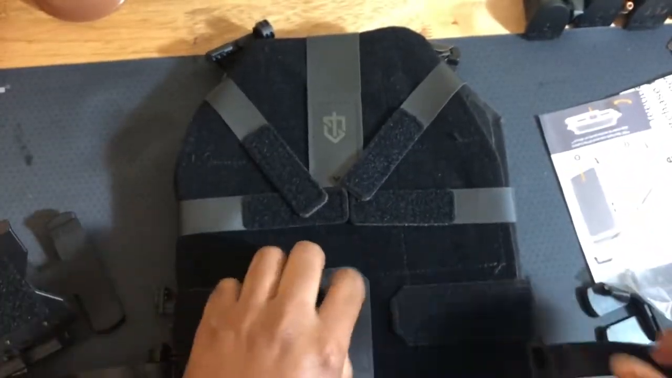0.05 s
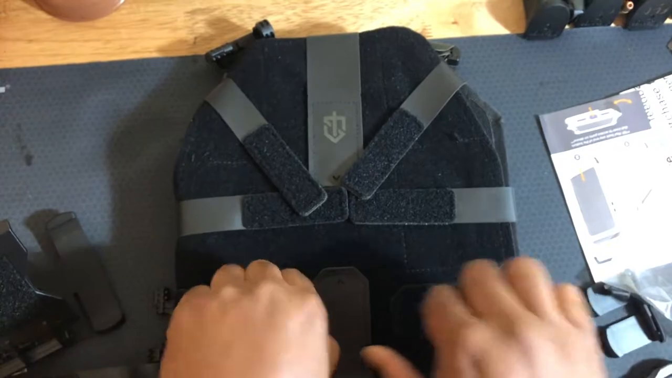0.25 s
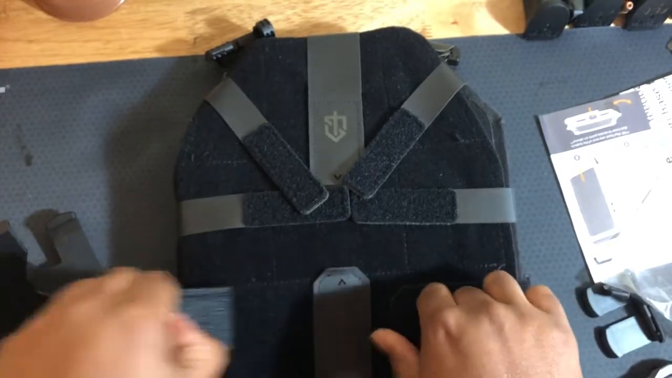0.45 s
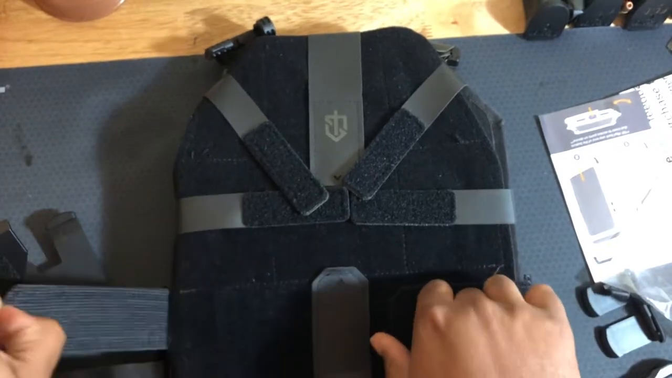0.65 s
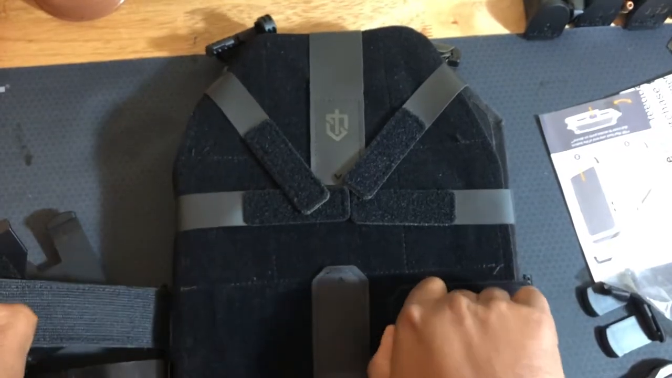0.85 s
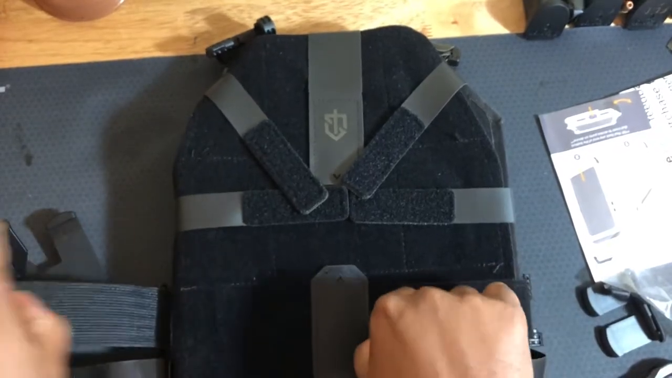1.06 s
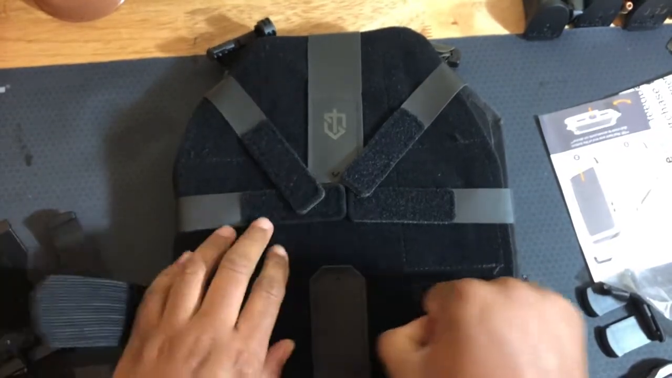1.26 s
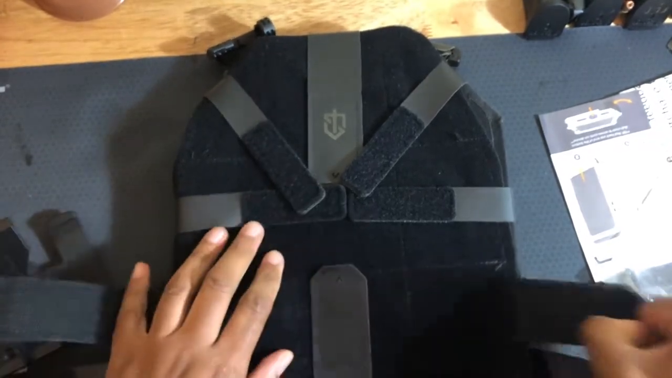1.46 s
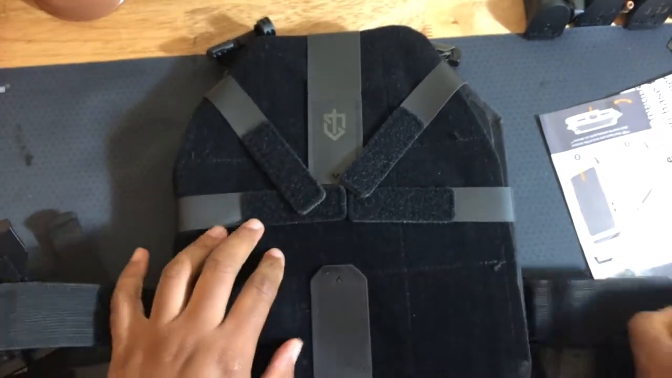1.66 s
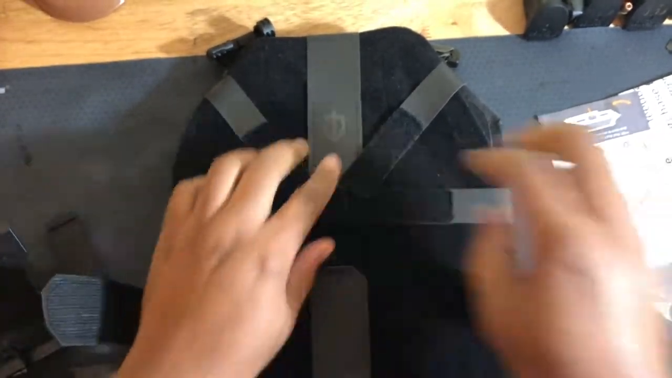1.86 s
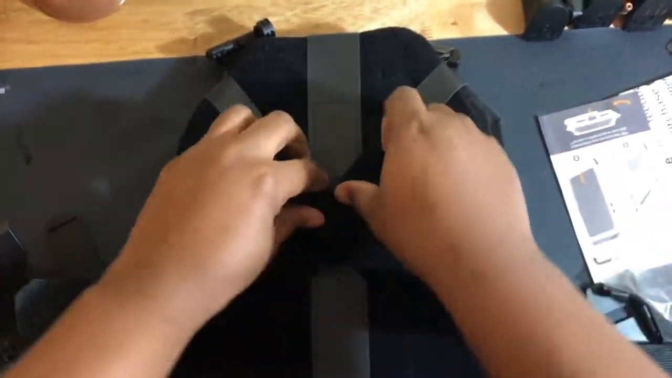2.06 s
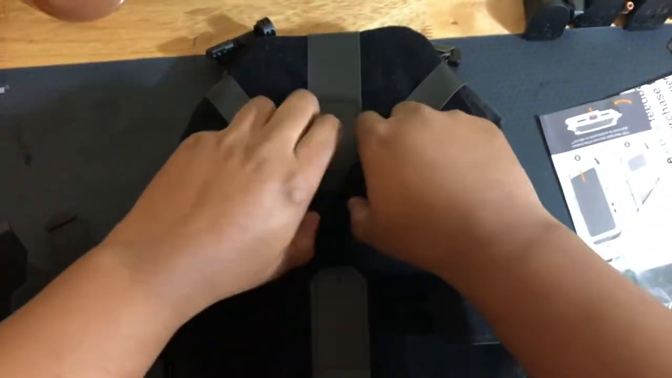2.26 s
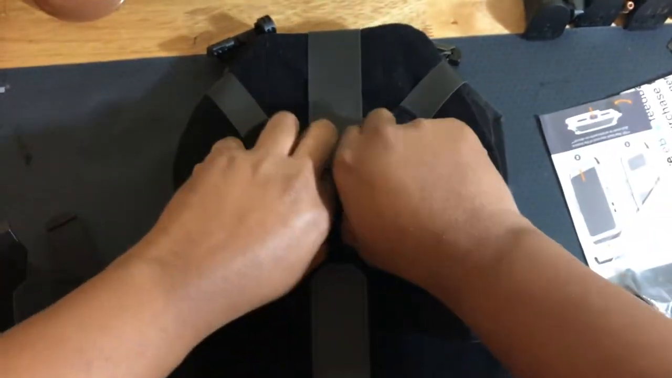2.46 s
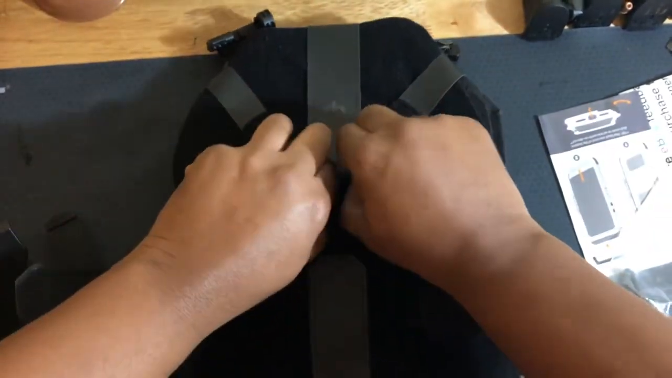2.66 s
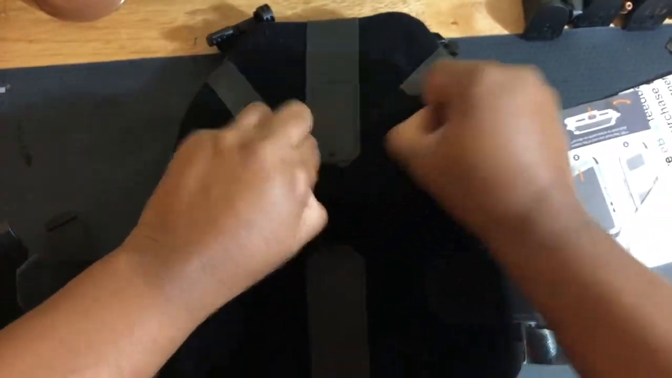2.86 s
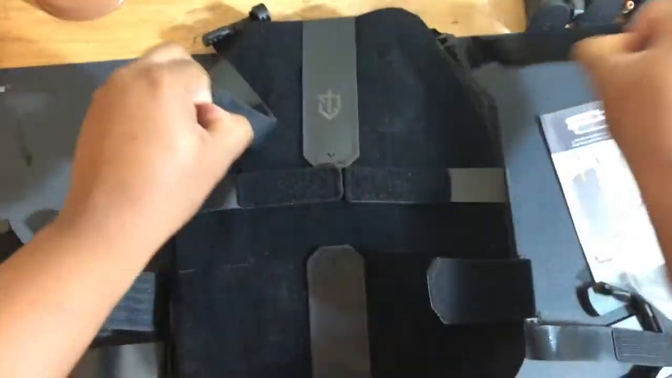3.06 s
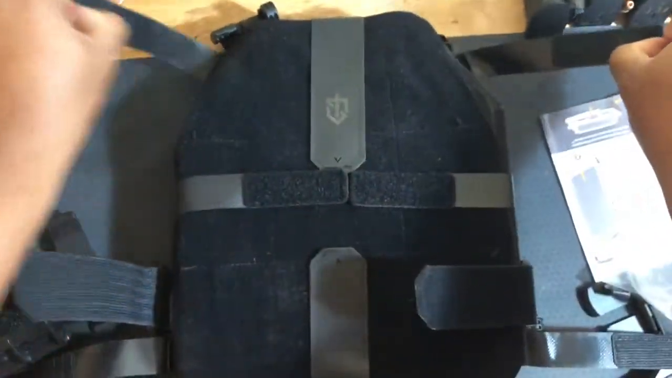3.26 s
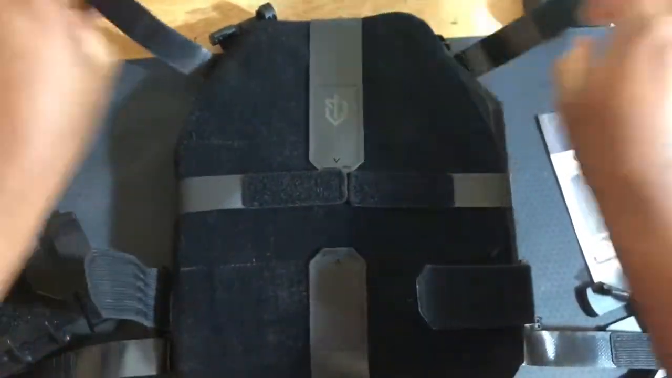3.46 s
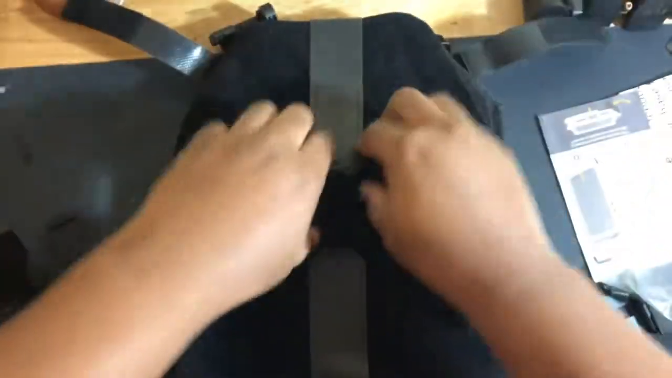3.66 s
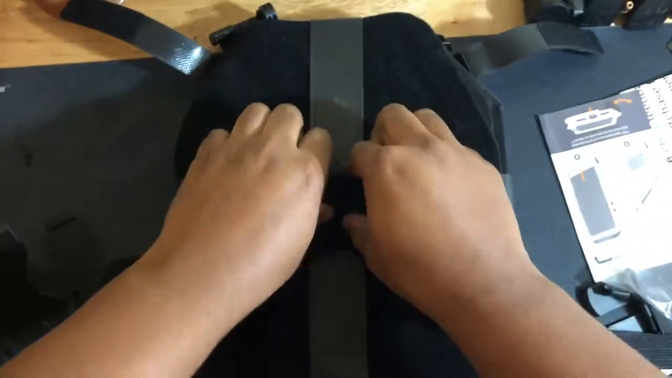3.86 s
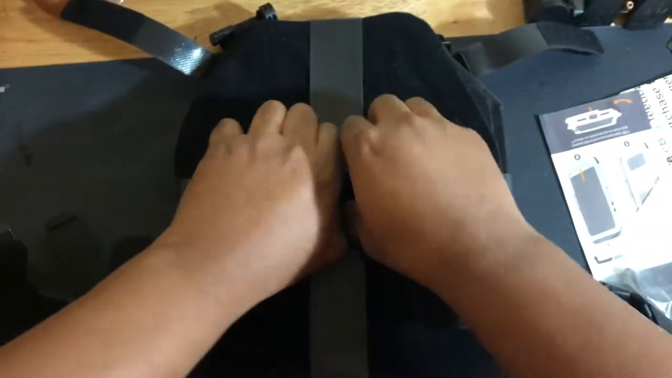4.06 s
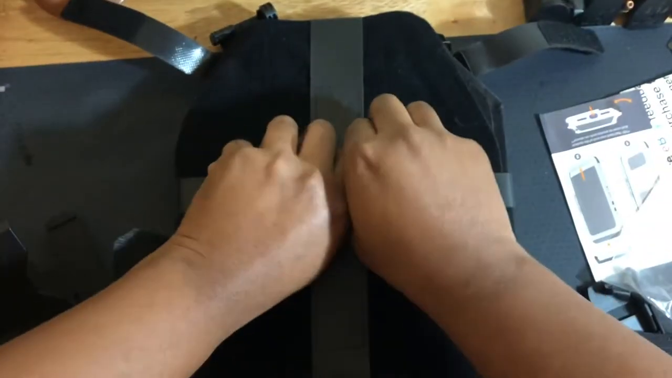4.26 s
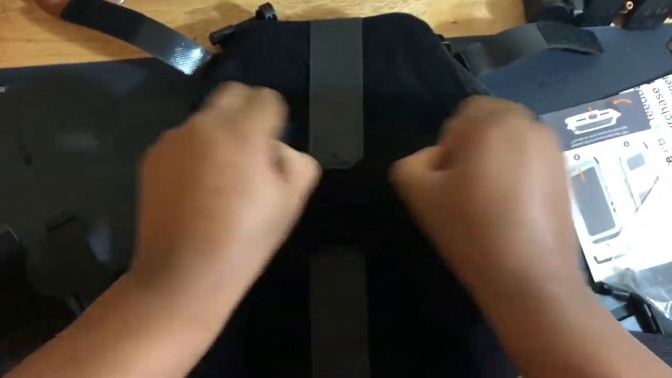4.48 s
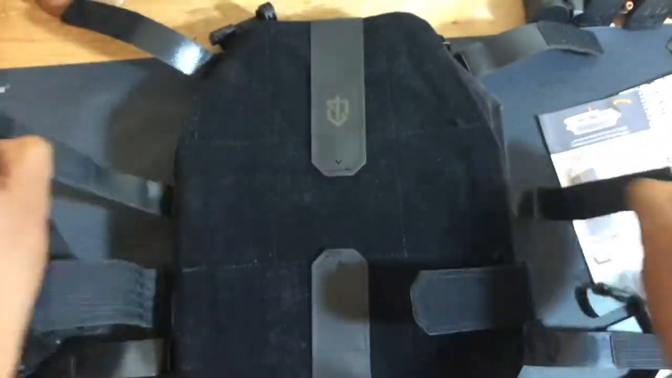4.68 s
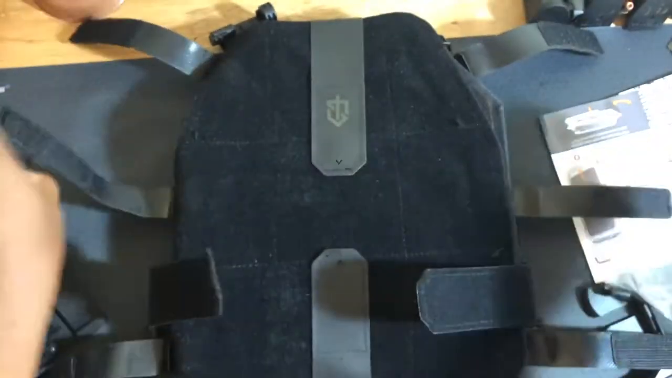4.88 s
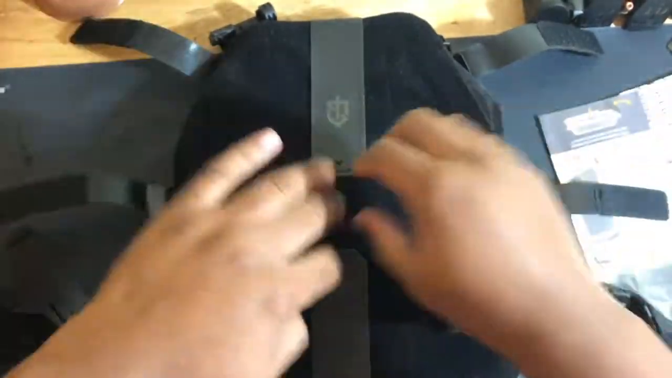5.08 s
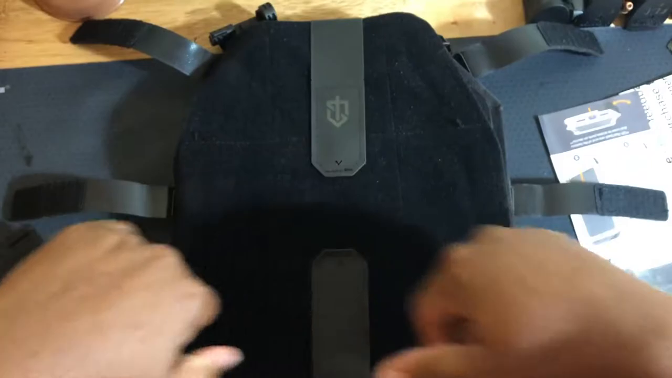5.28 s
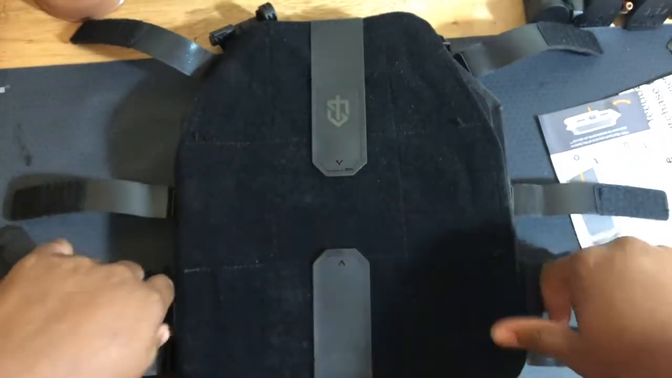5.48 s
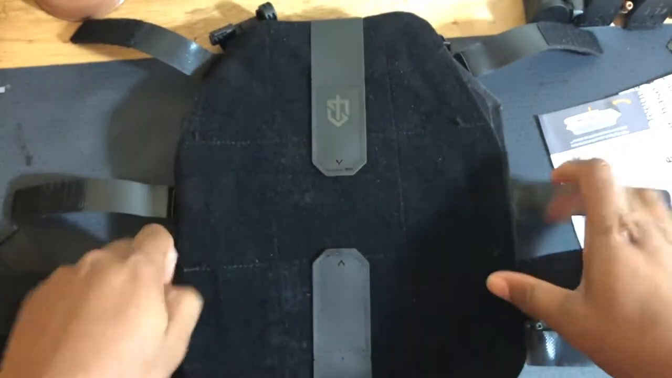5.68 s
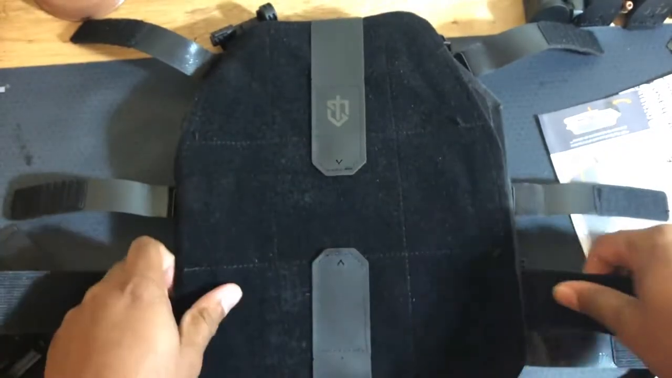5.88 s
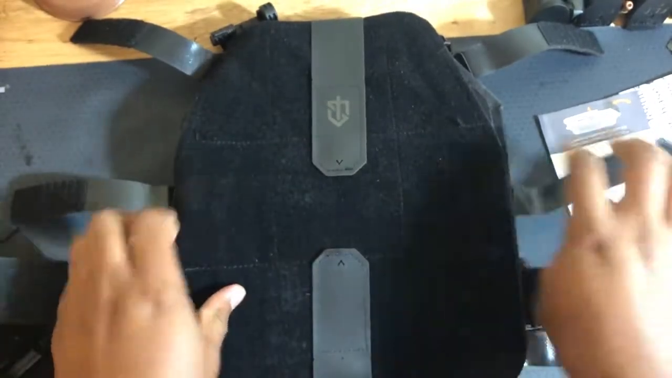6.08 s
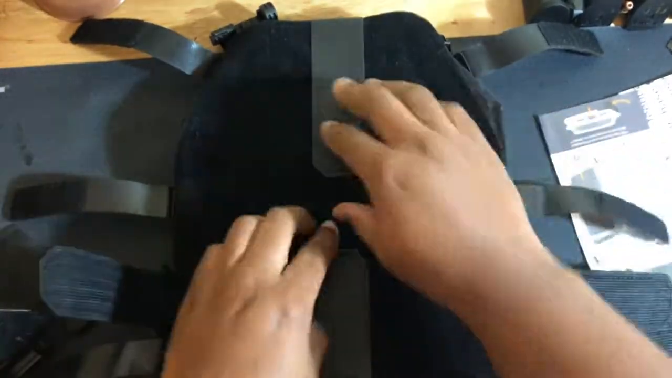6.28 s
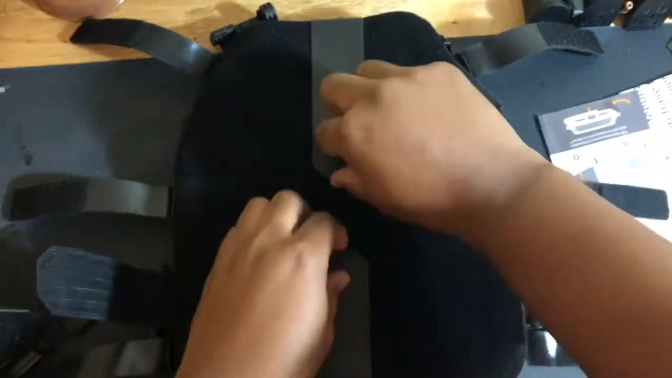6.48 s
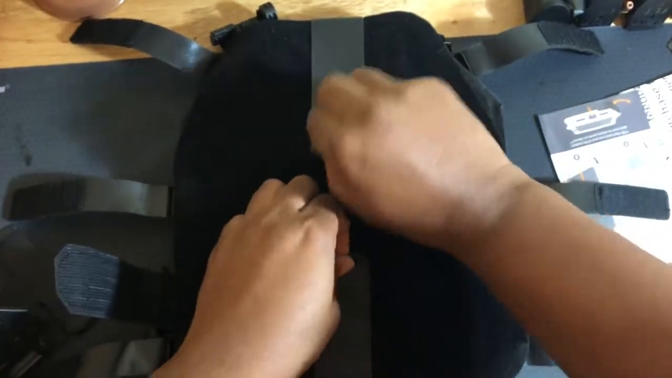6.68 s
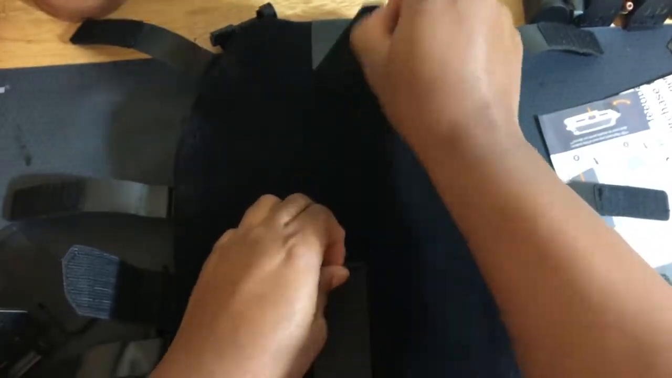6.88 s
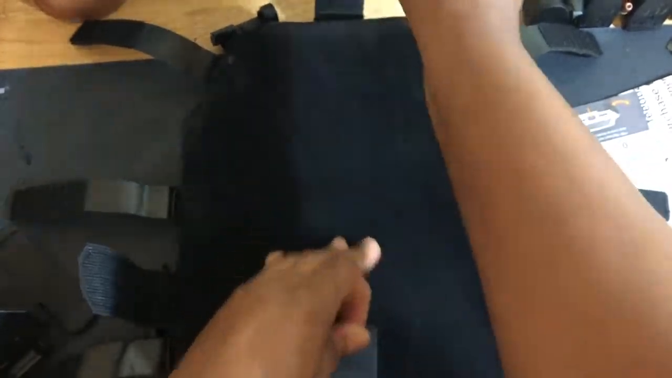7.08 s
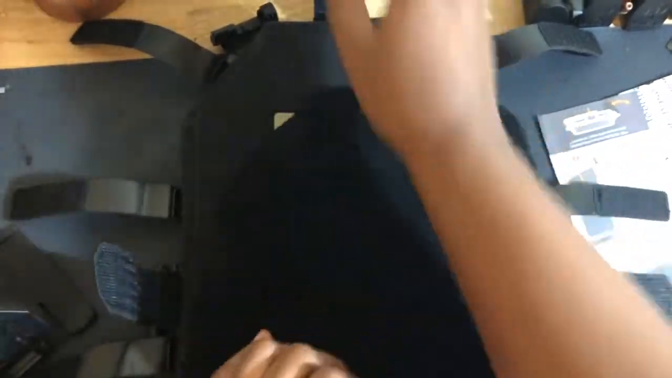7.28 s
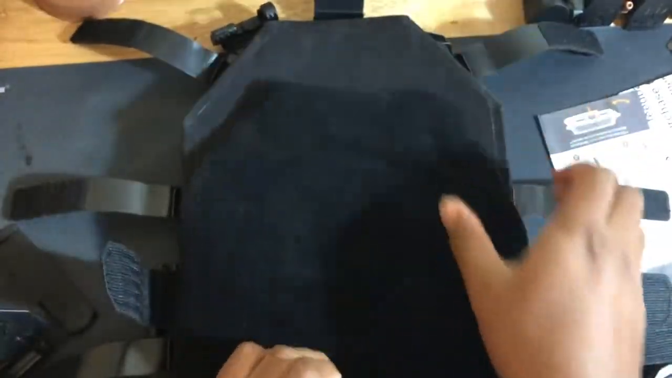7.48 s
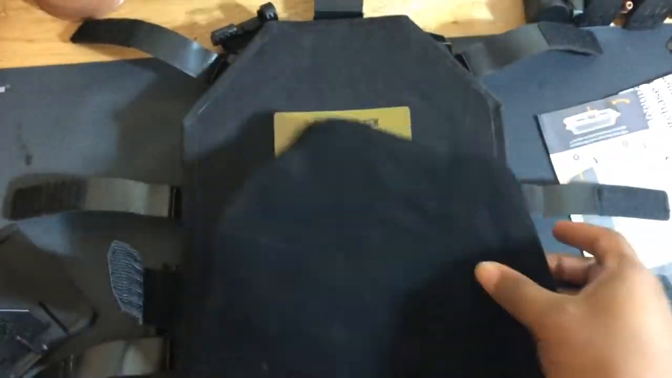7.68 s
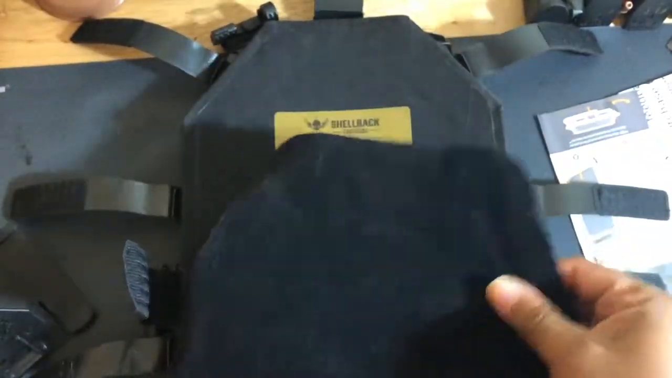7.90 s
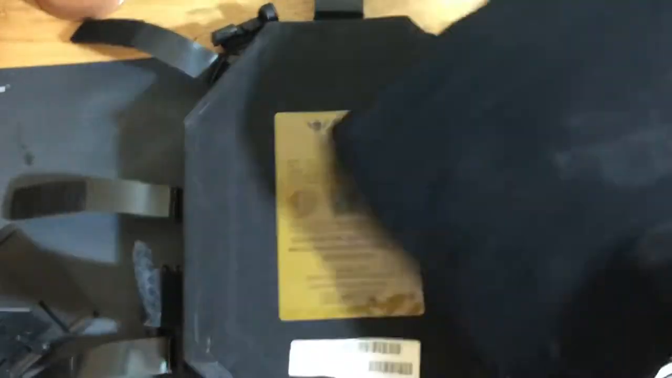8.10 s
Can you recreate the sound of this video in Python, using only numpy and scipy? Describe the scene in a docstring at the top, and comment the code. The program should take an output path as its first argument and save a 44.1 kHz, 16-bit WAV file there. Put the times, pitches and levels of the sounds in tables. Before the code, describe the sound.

Dry, gritty tearing of fastening tape, heard very near over a quiet steady hush. Several quick rips open, one longer tear follows, then scattered crackles lead to another burst, a swelling rip with a low flap thud, and more picking. A final run of tears frees a large padded panel, which flexes with small falling clicks before one abrupt loud rip. Short indoor echoes surround everything.

```python
"""In a small room, close to the microphone, hook-and-loop straps are ripped off a padded vest on a table.
Each rip is a swarm of hook clicks, filtered into sizzle, crackle, rasp and drumming; whole tufts snap loose.
Between rips fingers brush the cloth, a filtered hiss, and pick at the tabs, sparse hook clicks.
Freed straps twang as sagging sines with dull thuds; the stiff panel flexes as falling clicks and squeaks once.
Quick echoes and the decay of the room surround it all, over a steady hush of filtered noise."""
import sys
import numpy as np
from scipy import signal
from scipy.fft import rfft, irfft
from scipy.io import wavfile
from scipy.ndimage import uniform_filter1d

SR = 44100
rng = np.random.default_rng(int(sys.argv[2]) if len(sys.argv) > 2 else 0)


def dump_mix(stems):
    """Bounce the given channels to the path in sys.argv[1] as a 16-bit WAV at rate SR."""
    frames = np.atleast_2d(stems).T  # one column per channel
    limited = np.clip(frames, -1, 1)  # hard clip at full scale
    pcm = np.round(limited * 32767).astype(np.int16)
    wavfile.write(sys.argv[1], SR, pcm)


N = 358974
TIME = np.arange(N) / SR  # s
HZ = np.fft.rfftfreq(N, 1 / SR)

# Tugs that peel a strap or the panel. Each row: start in seconds, length in seconds, rise in seconds,
# level in dB before the trims of the voices and the rips, swell over the tug in dB, rasp at mid-tug in dB
# and drumming of the fabric in dB (both relative to that level), ring of the free flap in Hz.
TUG_ROWS = [(0.277, 0.21, 0.065, -21, -0.5, -3, -13.5, 2670),
            (0.478, 0.099, 0.004, -19, 4.5, -10.5, -16.5, 5610),
            (0.6, 0.036, 0.019, -18, -5, -13, -16.5, 4980),
            (0.676, 0.042, 0.038, -21, -1.5, -5.5, -13, 3120),
            (1.199, 0.31, 0.053, -21.5, 1, -3, -13, 2450),
            (2.751, 0.11, 0.0015, -26.5, 0.5, -4.5, -14, 2755),
            (2.825, 0.15, 0.037, -21, 1.5, -3.5, -19, 6500), (2.847, 0.02, 0.011, -16, -2, -3.5, -21, 6670),
            (2.997, 0.18, 0.005, -26.5, 2.5, -2.5, -22, 4430),
            (4.328, 0.26, 0.053, -24.5, 8, -5, -14.5, 2310),
            (5.867, 0.064, 0.015, -27, 0.5, -11, -25, 8240),
            (5.967, 0.091, 0.0087, -33, -1.5, -0.5, -13, 8750),
            (6.542, 0.255, 0.22, -25, 7, -3, -16.5, 6080), (6.798, 0.087, 0.003, -24.5, 1, -3, -17, 3100),
            (6.888, 0.048, 0.0072, -20, -6, -9, -20, 2910),
            (6.964, 0.086, 0.0034, -28.5, 0, -4.5, -16.5, 2630),
            (7.074, 0.011, 0.006, -24.5, -5, -9, -17, 5920),
            (7.914, 0.067, 0.0015, -16, 0, -13.5, -21.5, 9620),
            (7.975, 0.023, 0.015, -11, 6, -12, -19.5, 4490)]
# Tufts of hooks that give way together. Each row: time of the strong hook in seconds, level in dB before
# a common lift, rasp of the tape in relative dB before a common lift.
TUFT_ROWS = [(0.0797, -18, -15.5), (0.1675, -21, -15), (0.228, -21, -7), (0.239, -17, -5.5),
             (0.2752, -13, -2), (0.6, 0, -21), (0.6148, -2.5, -15.5), (0.717, -12, -8), (0.854, -19, -12),
             (0.9001, -18, -5), (0.906, -16.5, -11), (0.9434, -19, -5), (1.0104, -19.5, -5),
             (1.1192, -16.5, -8), (1.163, -18, -6), (1.1864, -12, -10), (1.5793, -14, -17),
             (1.6606, -25, -16), (1.684, -23, -15), (1.6895, -12.5, -12), (1.717, -21, -12.5),
             (1.895, -29, 6), (2.0976, -19.5, -8), (2.199, -22, -9), (2.3468, -13.5, -32),
             (2.3645, -15.5, -12), (2.4025, -11, -19), (2.4282, -14, -24), (2.446, -8.5, -18),
             (2.5151, -13.5, -20), (2.59, -26, -15), (2.616, -22, -27), (2.6527, -14.5, -1),
             (2.665, -14.5, -10), (2.724, -10.5, -8), (2.744, -11, -18), (2.7515, -3.5, -20),
             (2.8683, 3.5, -32), (3.1435, 0.5, -38), (3.151, -6, -26), (3.3136, -19, -20),
             (3.456, -33, -31), (3.6694, -21.5, -17.5), (3.6771, -20, 14), (4.008, -23.5, 3),
             (4.2261, -14, -9.5), (4.2685, -27, -19.5), (4.32, -23, -10.5), (4.3462, -12.5, -5),
             (4.8493, -21, -3), (5.334, -7.5, -2), (5.3653, -15.5, -4), (5.438, -9.5, -12.5),
             (5.5879, -12.5, 1), (5.7626, -18, -6), (5.7843, -17.5, -19), (5.9677, -18, -20),
             (6.2636, -26, 4), (6.315, -24.5, -1), (6.4974, -22.5, -17), (6.549, -19, -27),
             (7.3052, -23, -46), (7.3138, -24, -50), (7.516, -19, -3), (7.867, -21.5, 0), (7.905, -9, -22),
             (7.915, -14, -34)]
# Strokes of the hands over cloth and tabs. Each row: start in seconds, rise in seconds, fade in seconds,
# level in dB before the trims of the voices and the handling, rasp in dB and drumming in dB (both relative
# to that level), share of hooks picked loose from 0 to 1, ring of the flap in Hz.
STROKE_ROWS = [(0.0, 0.0031, 0.22, -46, -0.5, -11, 0.9, 3020),
               (0.165, 0.03, 0.3, -36.5, -2.5, -23, 0.85, 3020),
               (0.729, 0.0068, 0.115, -36, -6.5, -4.5, 0.4, 4620),
               (0.82, 0.098, 0.18, -39.5, -6.5, -29, 1, 4280),
               (0.99, 0.02, 0.28, -54.5, -1.5, 3, 0.5, 2700), (1.104, 0.07, 0.05, -43, 1.5, -21, 0.8, 2650),
               (1.525, 0.013, 0.19, -37.5, -6, -4.5, 0.7, 4900),
               (1.884, 0.0065, 1.3, -54, -3, -4, 0.4, 2810), (2.359, 0.075, 0.13, -36, -7, -61, 0.9, 7580),
               (2.5, 0.26, 0.11, -38, -4, -18.5, 1, 7920), (3.19, 0.011, 0.19, -49.5, 0, -7, 0.4, 3800),
               (3.348, 0.0057, 0.038, -47.5, -0.5, -13, 1, 3830), (3.66, 0.12, 0.77, -53, 2, -7, 0.6, 5140),
               (4.068, 0.05, 0.41, -44.5, 1.5, -16, 0.8, 4930),
               (4.154, 0.031, 0.054, -30.5, 1, -17.5, 0.7, 1330),
               (4.61, 0.01, 0.21, -45, 6.5, 2, 0.8, 1380), (4.997, 0.0126, 0.07, -58, -4.5, 1.5, 0.6, 1420),
               (5.15, 0.01, 0.17, -58.5, 4.5, -2, 0.5, 1400),
               (5.243, 0.045, 0.1, -40.5, 0.5, -9, 0.35, 1116),
               (5.334, 0.017, 0.22, -36.5, -2.5, -9.5, 0.4, 1134),
               (5.442, 0.11, 0.018, -29.5, -6.5, -17.5, 0.8, 3370),
               (5.579, 0.03, 0.5, -45, 1, -6.5, 0.24, 6030), (5.756, 0.029, 0.054, -43, -3, -4, 0.9, 8500),
               (6.03, 0.01, 0.11, -49, 5, 1.5, 0.5, 3170), (6.26, 0.062, 0.24, -54, 2, -3, 0.2, 2270),
               (6.474, 0.1, 0.12, -35, -8, -37, 0.9, 7940), (7.091, 0.016, 0.31, -44, 0.5, -10, 0.2, 5300),
               (7.345, 0.013, 0.033, -41.5, -10, -4.5, 0.4, 9300),
               (7.37, 0.058, 0.45, -53, 5.5, 3.5, 0.6, 3780), (7.64, 0.017, 0.29, -52, 0.5, 0, 0.45, 3850),
               (7.84, 0.07, 0.056, -51.5, -12, 7.5, 0.1, 3900),
               (8.01, 0.013, 0.51, -47.5, 0, -0.5, 0, 3870)]
# Knocks on the stiff panel and its sharp flexes. Each row: time in seconds, peak of the click in dB.
FLEX_ROWS = [(3.457, -39.5), (3.675, -38), (5.336, -28.5), (7.118, -25.5), (7.394, -26.5), (7.451, -32.5),
             (7.479, -29), (7.513, -29)]
# Loose straps and flaps twanging or landing. Each row: time in seconds, level in dB before the trims of
# tone and thud, pitch once settled in Hz, time for the tone to fall by 60 dB in seconds.
TWANG_ROWS = [(0.727, -32, 188, 0.055), (0.734, -28, 97, 0.15), (1.551, -36, 179.6, 0.23),
              (3.474, -38, 211, 0.11), (3.682, -34, 436, 0.081), (4.66, -25.5, 179, 0.11),
              (4.7, -12.5, 175, 0.095), (4.756, -28, 159, 0.12), (5.154, -28.5, 195, 0.021),
              (8.004, -34, 74.6, 0.23)]
# Colour of the ripping tape. Each row: frequency in Hz, relative level in dB per Hz.
TAPE_COLOUR = [(35, -44.5), (60, -6), (280, -7.5), (448, -7), (605, -5.5), (762, -4.5), (1210, -5.5),
               (1800, -2), (2530, -0.5), (3190, 0), (6230, 1), (15000, 7)]
# Colour of a snapping tuft. Each row: frequency in Hz, relative level in dB.
TUFT_COLOUR = [(100, -29.5), (600, -7.5), (1500, -0.5), (3000, 4), (7000, 9), (10000, 7), (16000, 3.5)]
# Colour of the brushed cloth. Each row: frequency in Hz, relative level in dB per Hz.
CLOTH_COLOUR = [(35, -43), (60, 6.5), (182, 4.5), (224, -17), (355, 4), (408, -10), (648, -1.5),
                (1920, -12.5), (3930, -6.5), (15000, -7)]
# Resonances of the vest on the table. Each row: frequency in Hz, width in Hz, lift in dB (a cut if negative).
VEST_RESONANCES = [(182, 24, 4.5), (347.5, 22, 8.5), (453, 37, 8), (570, 280, -1.5), (780, 44, 3.5),
                   (1024, 160, 2.5)]
# Decay of the room. Each row: frequency in Hz, time to fall by 60 dB in seconds.
ROOM_DECAY = [(100, 0.37), (500, 0.89), (2000, 0.42), (4000, 0.29), (8000, 0.27), (16000, 0.13)]
# Colour of the room's hush. Each row: frequency in Hz, relative level in dB per Hz.
AIR_COLOUR = [(20, -1.5), (110, 7), (350, 1), (500, -5), (4000, -15), (16000, -24.5)]

# A tug starts at a share of its strength and dies quickly when it ends; the rasp fades as the peel tightens.
GRAB, LET_GO_DB_PER_S, TIGHTEN_DB_PER_S = 0.18, 752.5, 6
# A stroke starts at a share of its strength and loses FADE_DB in its fade time.
TOUCH, FADE_DB, FADE_BEND = 0.31, 20.5, 1.02
CLOTH_CREASE_DB = 1.8  # depth of the small resonances that come and go as the cloth creases
# The panel squeaks as it slides; level and pitch waver about these.
SQUEAK_S, SQUEAK_LENGTH_S, SQUEAK_DB, SQUEAK_HZ = 7.65, 0.085, -48, 1765
AIR_DB = -60.5  # rms of the hush
EDGE_HZ = 16100  # upper limit of the microphone channel


def rips():
    """Each tug takes hold, peels and lets go; the stronger the pull, the more hooks fail each second."""
    power = np.zeros((4, N))
    for start, length, rise, level, swell, rasp, drum, _ in TUG_ROWS:
        from_middle = np.clip(TIME - start, 0, length) - length / 2
        release_db = LET_GO_DB_PER_S * np.clip(TIME - start - length, 0, 1)
        envelope = gate(start, rise, GRAB) * amp(swell * from_middle / length - release_db)
        tightening_rasp = rasp - TIGHTEN_DB_PER_S * from_middle
        power += voices(envelope, level, tightening_rasp, drum) ** 2
    gains = np.sqrt(power)
    per_s = 300 + 3400 * (gains[1] / amp(-23)) ** 1.4
    hooks = crackle(per_s, spread_db=3.5, slips_per_s=140, slip_s=0.0047, steady=1.0)
    return amp(-2.5) * radiate(hooks, TAPE_COLOUR, gains, TUG_ROWS, patchy_db=2.0, lift_db=7.0)


def snaps(count=5, lift_db=4.0, spread_s=0.0045, warning_db=-13, warning_s=0.0042):
    """A tuft gives way: weak hooks go first, then a strong one drags its neighbours along in milliseconds."""
    out = np.zeros(N)
    hz = np.fft.rfftfreq(2048, 1 / SR)
    lead_s = 0.01  # room for the early hooks
    for s, db, rasp_db in TUFT_ROWS:
        tuft = np.zeros(2048)
        add(tuft, lead_s, hook(ring_s=0.0028, ring_db=6))
        for lag, early in rng.random((count, 2)):
            neighbour = amp(-0.5 - 6.3 * lag) * hook(ring_s=0.00064, ring_db=13.5)
            add(tuft, lead_s + spread_s * lag, neighbour)
            weak = amp(warning_db - 21 * early) * hook(ring_s=0.0013, ring_db=5)
            add(tuft, lead_s - warning_s * early, weak)
        rasp_lift_db = (rasp_db + 16) * below(hz, edge_hz=5550)
        flap_lift_db = lift_db * flap_ring(hz, [s], STROKE_ROWS)[:, 0]
        tuft = irfft(rfft(tuft) * amp(read(TUFT_COLOUR, hz) + rasp_lift_db + flap_lift_db))
        add(out, s - lead_s, amp(db + 9.5) * tuft / np.linalg.norm(tuft))
    return out


def handling():
    """Fingers brush the cloth with a soft hiss and pick stray hooks loose one by one."""
    power, picked = np.zeros((4, N)), np.zeros(N)
    for start, rise, fade, level, rasp, drum, share, _ in STROKE_ROWS:
        fading = np.clip((TIME - start - rise) / fade, 0, 10) ** FADE_BEND
        envelope = gate(start, rise, TOUCH) * amp(-FADE_DB * fading)
        stroke = voices(envelope, level, rasp, drum) ** 2
        power += stroke
        picked += share * stroke[1]
    gains = np.sqrt(power)
    picking = np.clip(picked / (power[1] + 1e-20), 0, 1)
    per_s = 280 + 800 * gains[1] / amp(-39.5)
    ticks = crackle(per_s, spread_db=7.5, slips_per_s=45, slip_s=0.014, steady=0.54)
    hiss = rng.standard_normal(N)
    rustle = np.sqrt(picking) * ticks + np.sqrt(1 - picking) * hiss
    return amp(-2) * radiate(rustle, CLOTH_COLOUR, gains, STROKE_ROWS, patchy_db=CLOTH_CREASE_DB, lift_db=3.5)


def flexes(travel_s=0.007, damp_hz=420):
    """Bending waves cross the panel, treble first and bass last: each click falls in pitch."""
    out = np.zeros(N)
    hz = np.fft.rfftfreq(4096, 1 / SR)
    for s, db in FLEX_ROWS:
        lag = travel_s * rng.uniform(0.82, 1.0)
        phase = 4 * np.pi * lag * np.sqrt(300 * hz)  # the delay is lag at 300 Hz and goes as 1 / sqrt(Hz)
        damping = (1 - below(hz, edge_hz=117)) / (1 + (hz / damp_hz) ** 1.23)
        wave = irfft(damping * np.exp(-1j * phase))
        add(out, s, amp(db) * wave / abs(wave).max())
        # the waves scatter between the edges
        add(out, s + lag, amp(db - 7.5) * thud(low_hz=89.0, high_hz=800, t60=0.34))
    return out


def twangs():
    """A freed strap slaps the padding and swings; its pitch sags as it goes slack."""
    out = np.zeros(N)
    t = np.arange(SR // 2) / SR
    for s, db, hz, t60 in TWANG_ROWS:
        pitch = hz * (1 + 0.37 * np.exp(-t / 0.0039))
        phase = 2 * np.pi * np.cumsum(pitch) / SR
        envelope = amp(db - 1.5 - 60 * t / t60) * (1 - np.exp(-t / 0.0037))
        add(out, s, envelope * np.sin(phase))
        add(out, s, amp(db - 10) * thud(low_hz=0.65 * hz, high_hz=1.8 * hz, t60=0.2))
    return out


def squeak():
    """A brief unsteady stick-slip tone that swells and fades."""
    arch = np.sin(np.pi * np.clip((TIME - SQUEAK_S) / SQUEAK_LENGTH_S, 0, 1)) ** 2
    pitch = SQUEAK_HZ * (1 + 0.016 * wander(rate_hz=260))
    phase = 2 * np.pi * np.cumsum(pitch) / SR
    return arch * amp(SQUEAK_DB + 4.5 * wander(rate_hz=93)) * np.sin(phase)


def room(x, wet_db, near_db=5, near_s=0.024, move_s=0.13, count=3):
    """Quick echoes off table and arms, shifting as the arms move, then the room, each band dying at its speed."""
    t, out = np.arange(SR) / SR, np.zeros(N)
    for k in range(count):
        taps = rng.standard_normal(SR) * (rng.random(SR) < 0.15) * (t > 0.002)
        taps *= 1 + amp(near_db) * np.exp(-t / near_s)  # near surfaces strengthen the early echoes
        hz, age, z = signal.stft(taps, SR, nperseg=256)
        decay = amp(-60 * age / read(ROOM_DECAY, hz)[:, None])
        tail = signal.istft(z * decay, SR, nperseg=256)[1]
        # the sets of echoes take turns smoothly, at constant total power
        pose = np.sqrt(2 / count) * np.cos(np.pi * (TIME / move_s + k) / count)
        out += signal.fftconvolve(x * pose, tail / np.linalg.norm(tail))[:N]
    return x + amp(wet_db) * out


def air():
    """The steady hush of the room: noise shaped by its colour."""
    spectrum = rfft(rng.standard_normal(N)) * amp(read(AIR_COLOUR, HZ))
    return amp(AIR_DB) * evened(irfft(spectrum, N))


def hook(ring_s, ring_db):
    """One hook letting go: a click, then a very short shiver of the tape; unit energy."""
    t = np.arange(512) / SR
    shiver = rng.standard_normal(len(t)) * np.exp(-t / ring_s)
    click = amp(ring_db) * shiver / np.linalg.norm(shiver)
    click[0] += rng.choice([-1, 1])
    return click / np.linalg.norm(click)


def crackle(per_s, spread_db, slips_per_s, slip_s, steady, count=16):
    """Hooks fail in avalanches that start at once and die away; each patch of tape shivers in its own way."""
    starts = (rng.random(N) < slips_per_s / SR) * rng.uniform(0.14, 1, N)
    avalanches = signal.lfilter([1], [1, -np.exp(-1 / (slip_s * SR))], starts)
    surge = steady + np.minimum(avalanches, 1)
    strength = amp(spread_db * np.minimum(rng.exponential(1, N), 2.5))
    fails = rng.random(N) < per_s / SR
    size = strength * fails * surge / np.sqrt(per_s)  # a denser swarm keeps the same power
    patch = rng.integers(0, count, N)
    out = np.zeros(N)
    for k in range(count):
        out += signal.oaconvolve(size * (patch == k), hook(ring_s=0.00084, ring_db=5))[:N]
    return evened(out)


def radiate(drive, colour, gains, moves, patchy_db, lift_db):
    """The hooks radiate the treble, the taut tape the middle, the fabric under it the bass."""
    hz, t, z = signal.stft(vest(drive), SR, nperseg=512, noverlap=384)
    # small resonances come and go as the material creases
    creases = uniform_filter1d(rng.standard_normal(z.shape), size=5, axis=0)
    creases = evened(uniform_filter1d(creases, size=16, axis=1))
    shape = amp(read(colour, hz)[:, None] + lift_db * flap_ring(hz, t, moves) + patchy_db * creases)
    under_sizzle = below(hz, edge_hz=9900)
    under_crackle = below(hz, edge_hz=4390)
    drumming = below(hz, edge_hz=1150)
    shares = (1 - under_sizzle, under_sizzle - under_crackle, under_crackle - drumming, drumming)
    out = np.zeros(N)
    for gain, share in zip(gains, shares):
        band = shape * share[:, None]
        band = band / np.linalg.norm(band, axis=0)  # the gain alone sets the level
        out += gain * evened(signal.istft(z * band, nperseg=512, noverlap=384)[1][:N])
    return out


def vest(x):
    """The vest on the table rings briefly at its own pitches and radiates no deep bass."""
    for hz, width, db in VEST_RESONANCES:
        x = x + (amp(db) - 1) * signal.lfilter(*signal.iirpeak(hz, hz / width, fs=SR), x)
    return signal.sosfilt(signal.butter(2, 115, btype="high", fs=SR, output="sos"), x)


def flap_ring(hz, times, moves, octaves=0.33):
    """Resonance of the free flap, frequencies by times: each move of the hands sets its pitch anew."""
    rows = np.array(moves)
    latest = np.searchsorted(rows[1:, 0], times)
    away = np.log2(hz + 1)[:, None] - np.log2(rows[latest, -1])
    return 1 / (1 + (away / octaves) ** 2)


def voices(envelope, level, rasp, drum, sizzle=0.65):
    """Gains over time of the sizzle, the crackle, the rasp and the drumming."""
    top = level - 2.5 - sizzle * np.minimum(rasp + 7, 2)  # a tight peel has little rasp and more sizzle
    return np.array([envelope * amp(db) for db in (top, level - 2, level + rasp, level + drum)])


def gate(start, rise, first, contact_s=0.0044):
    """Makes contact at a first share of full strength, then grows to 1."""
    contact = np.clip((TIME - start) / contact_s + 0.5, 0, 1)
    growth = first + (1 - first) * (TIME - start) / max(rise, 1e-3)
    return contact * np.clip(growth, 0, 1)


def thud(low_hz, high_hz, t60):
    """A blow on the padding or panel: a dull puff of unit peak with no clear pitch."""
    t, hz = np.arange(8192) / SR, np.fft.rfftfreq(8192, 1 / SR)
    puff = irfft(rfft(rng.standard_normal(len(t))) * below(hz, high_hz) * (1 - below(hz, low_hz)))
    puff *= amp(-60 * t / t60) * (1 - np.exp(-t / 0.0029))
    return puff / abs(puff).max()


def wander(rate_hz):
    """Smooth chance of rms 1, moving up to about the given rate."""
    return evened(irfft(rfft(rng.standard_normal(N)) / (1 + (HZ / rate_hz) ** 4), N))


def below(hz, edge_hz):
    """Share of the sound that lies under a soft edge."""
    return 1 / (1 + (hz / edge_hz) ** 6)


def amp(db):
    """Decibels to gain."""
    return 10 ** (np.asarray(db) / 20)


def evened(x):
    """Scales to rms 1."""
    return x / np.sqrt(np.mean(x ** 2) + 1e-20)


def read(points, hz):
    """Reads a table on a log-frequency axis."""
    f, value = np.transpose(points)
    return np.interp(np.log(hz + 1), np.log(f + 1), value)


def add(mix, s, sound):
    """Mixes a sound in at time s."""
    part = mix[max(round(s * SR), 0):][:len(sound)]
    part += sound[:len(part)]


def scene():
    """Everything sounds on the table, in one room, over its hush."""
    table = rips() + snaps() + handling() + flexes() + twangs() + squeak()
    return (room(table, wet_db=-10.5) + air())[None]


def record(dry):
    """The microphone channel clips at full scale, then loses everything above its band limit."""
    lowpass = signal.firwin(511, EDGE_HZ, window=("kaiser", 9), fs=SR)
    return signal.oaconvolve(np.clip(dry, -1, 1), lowpass[None], "same")


dry = scene()
out = record(dry)
dump_mix(out)
```